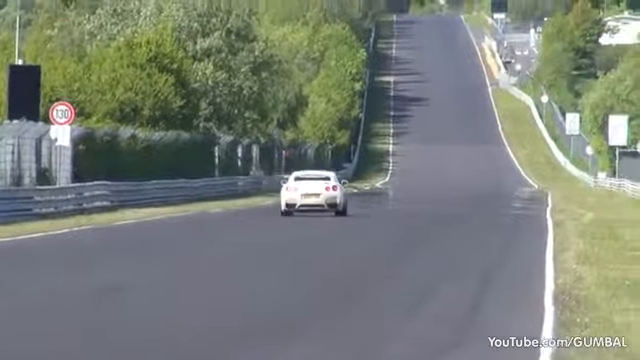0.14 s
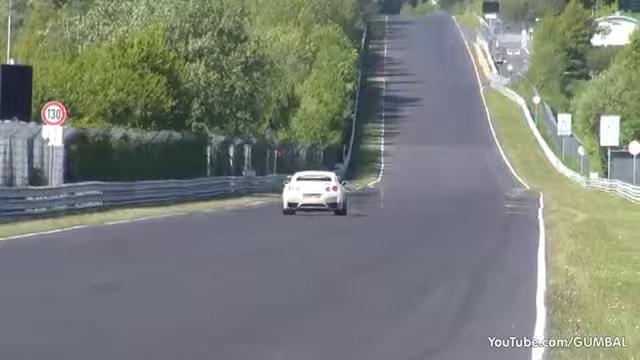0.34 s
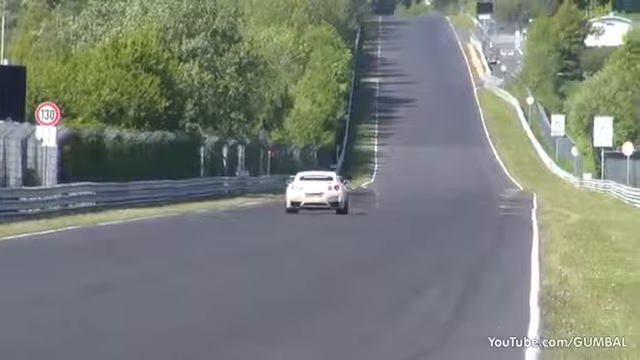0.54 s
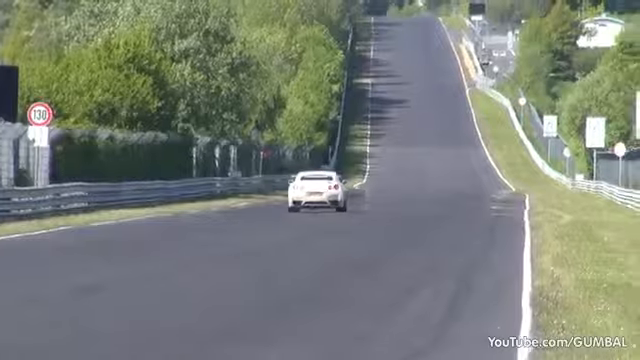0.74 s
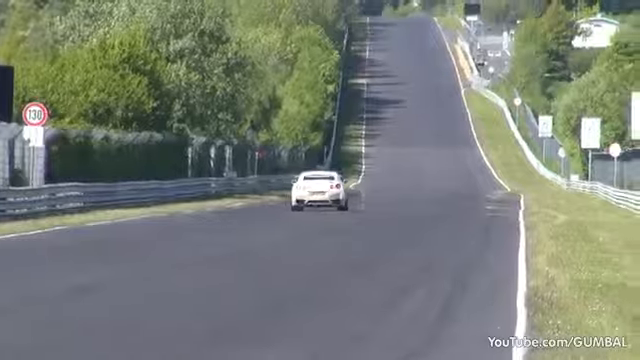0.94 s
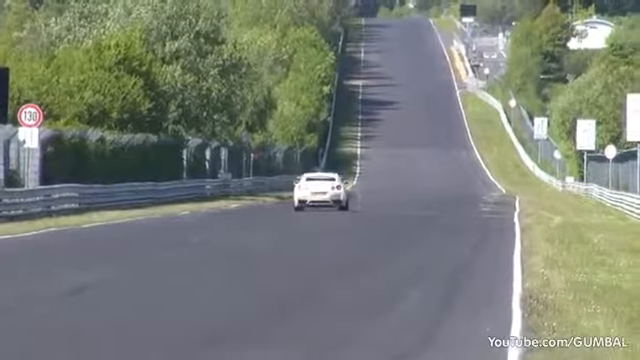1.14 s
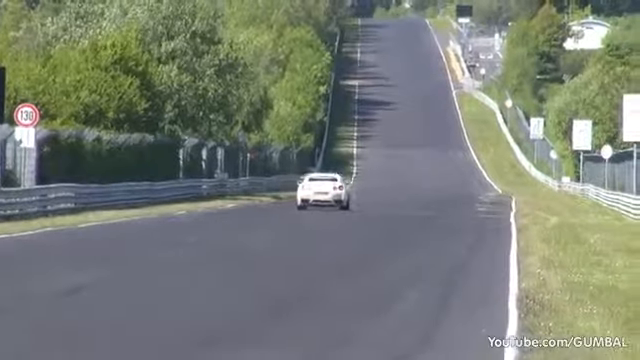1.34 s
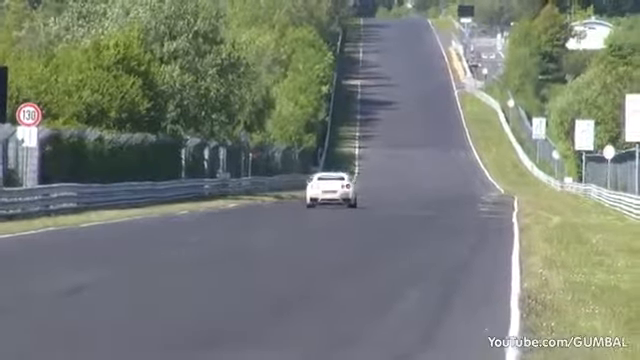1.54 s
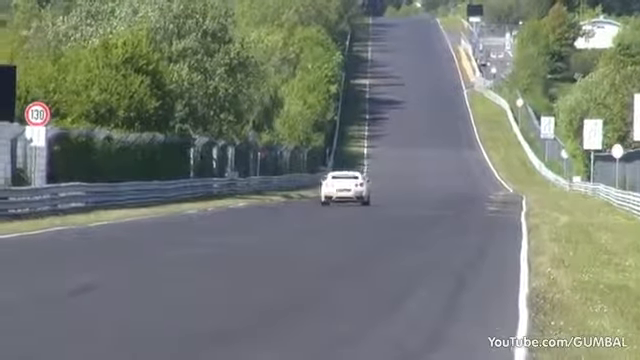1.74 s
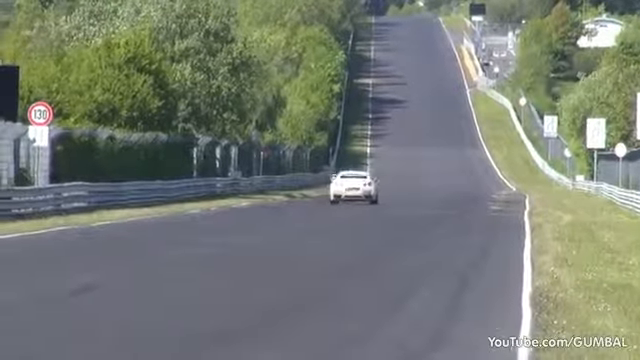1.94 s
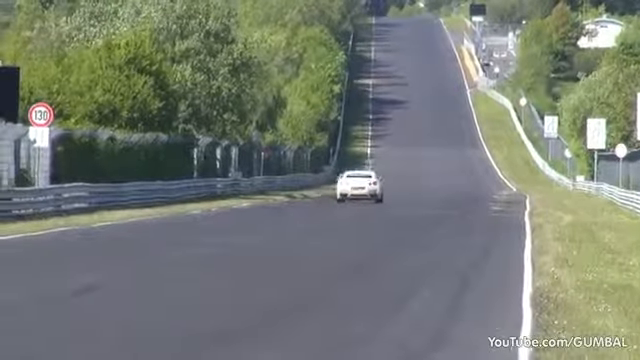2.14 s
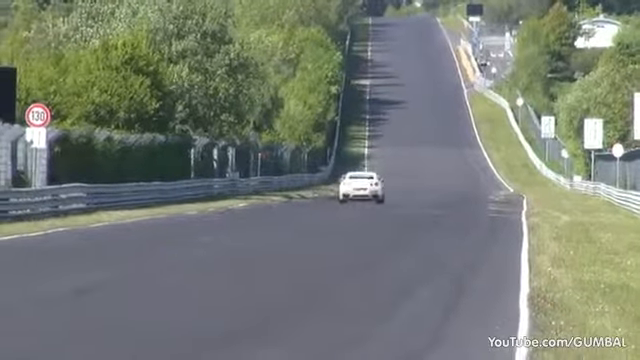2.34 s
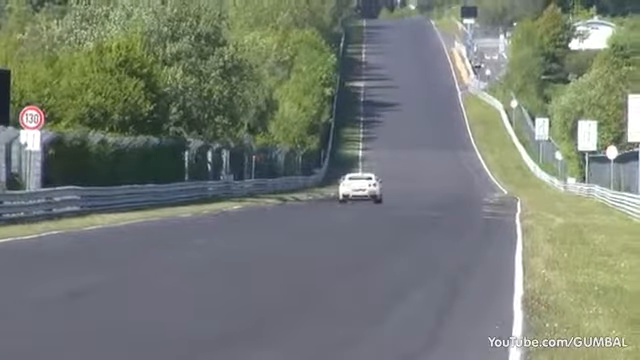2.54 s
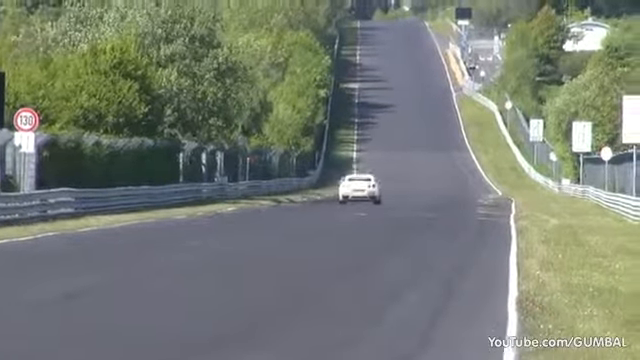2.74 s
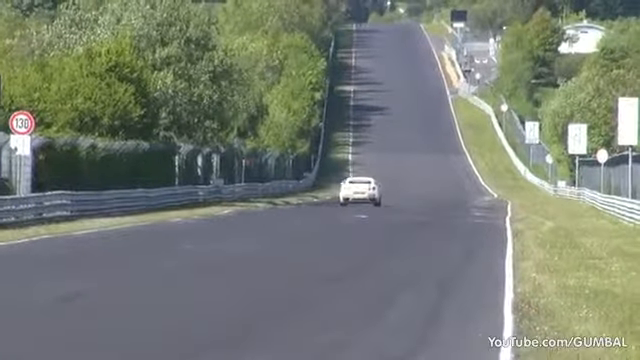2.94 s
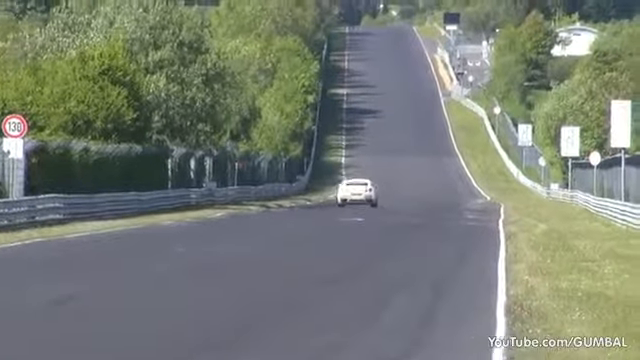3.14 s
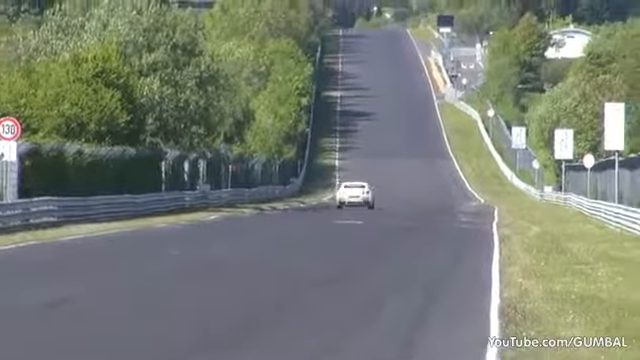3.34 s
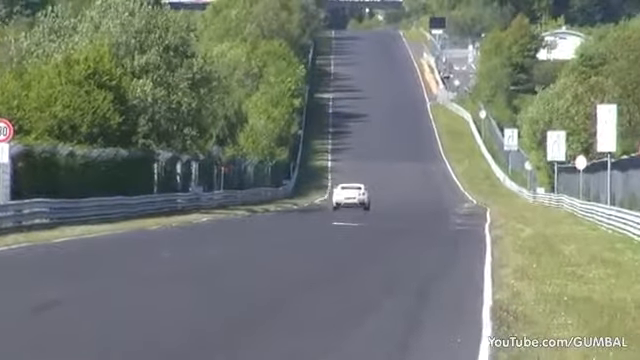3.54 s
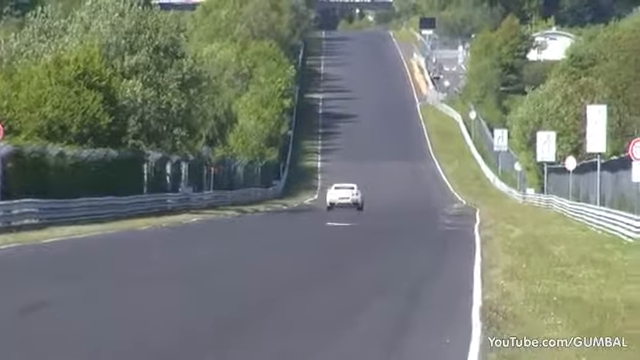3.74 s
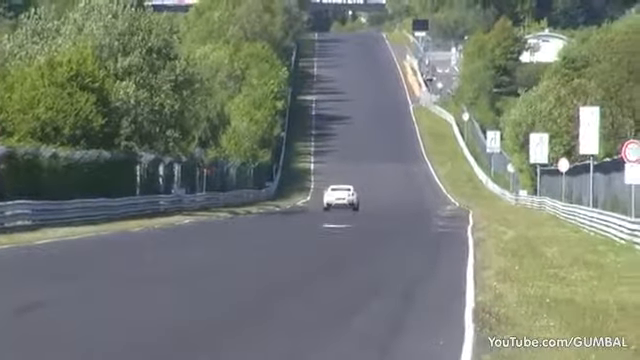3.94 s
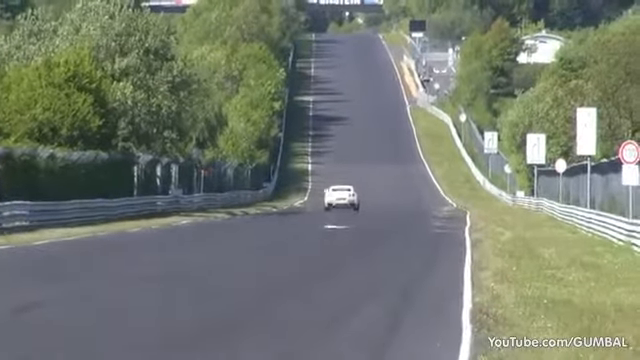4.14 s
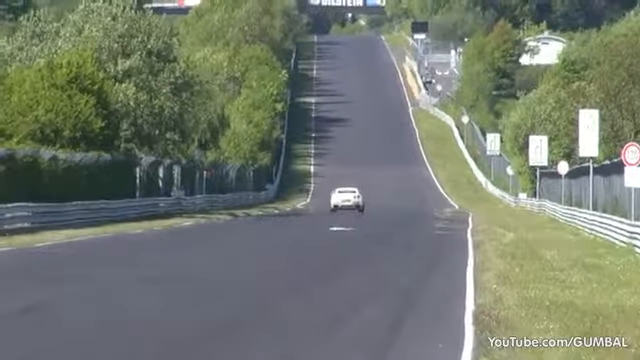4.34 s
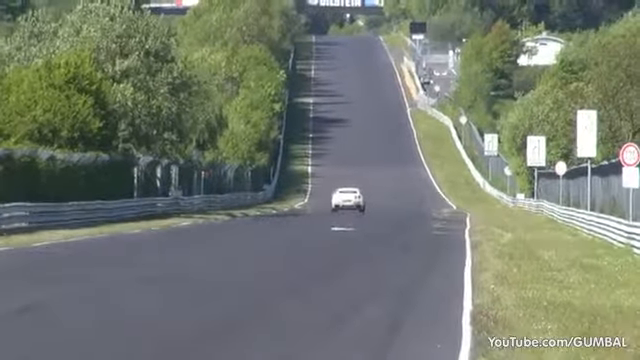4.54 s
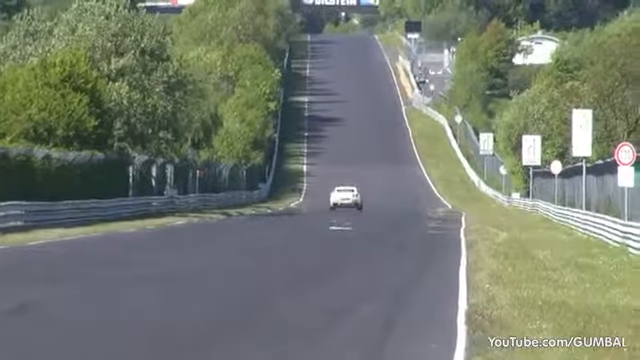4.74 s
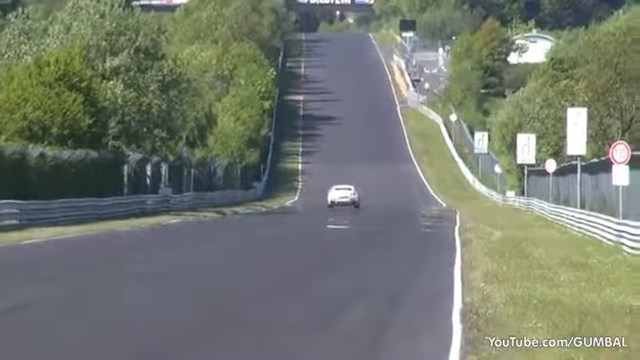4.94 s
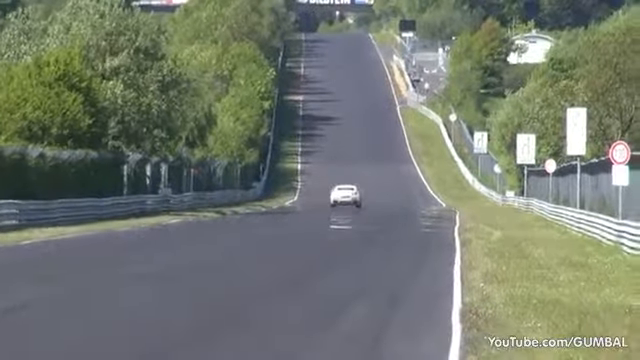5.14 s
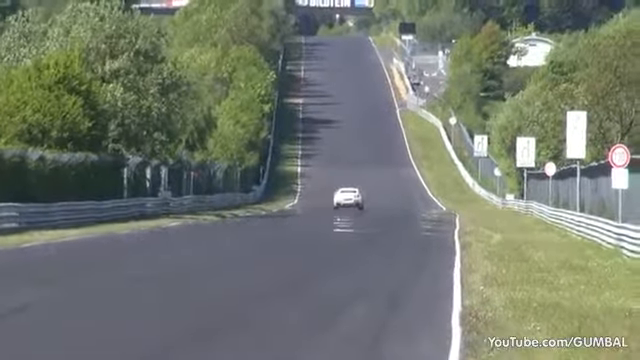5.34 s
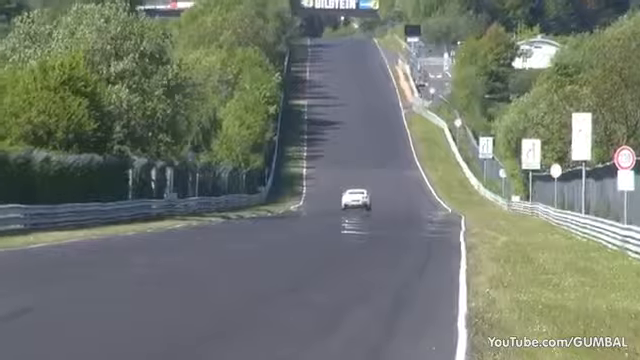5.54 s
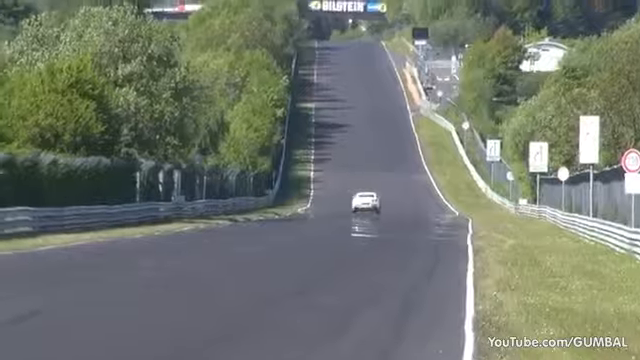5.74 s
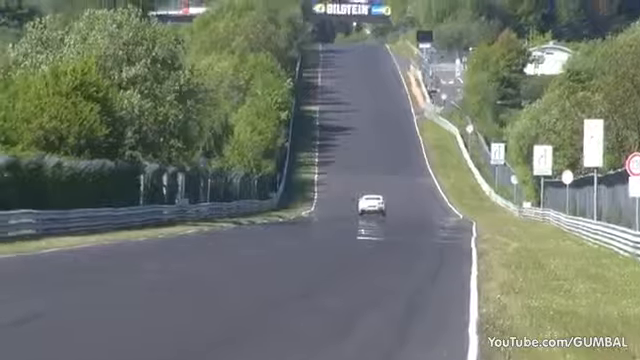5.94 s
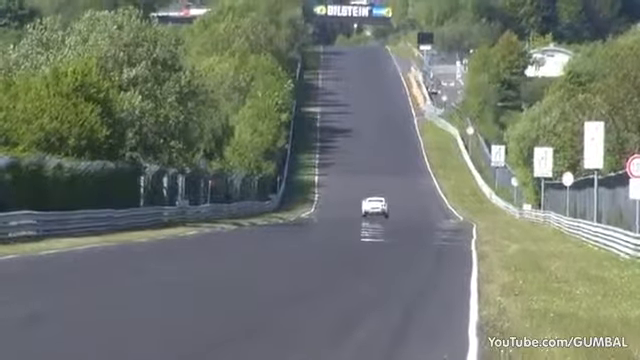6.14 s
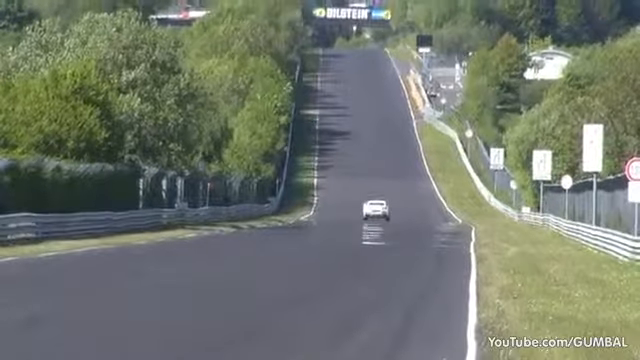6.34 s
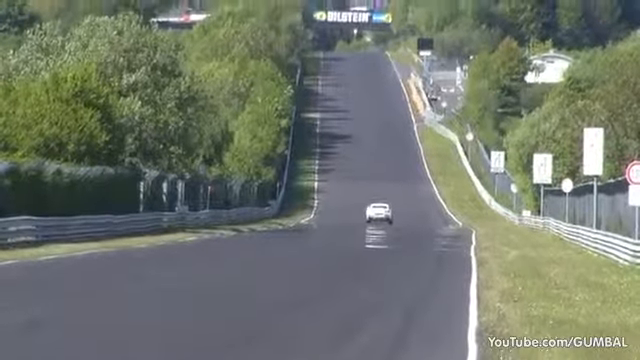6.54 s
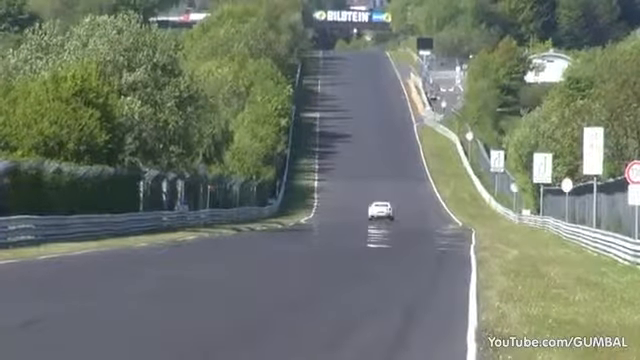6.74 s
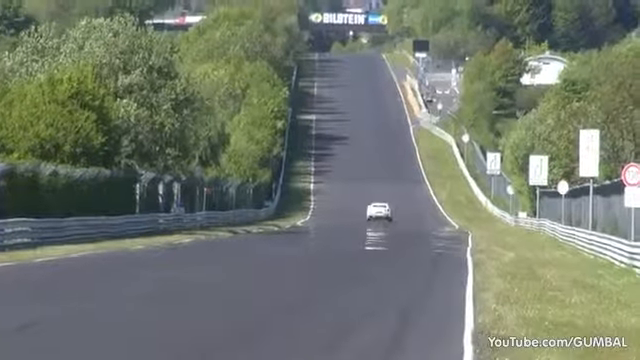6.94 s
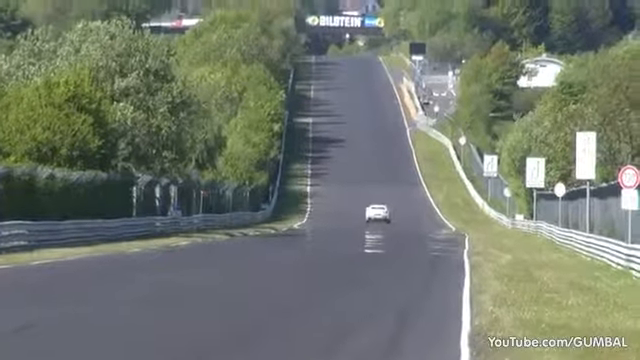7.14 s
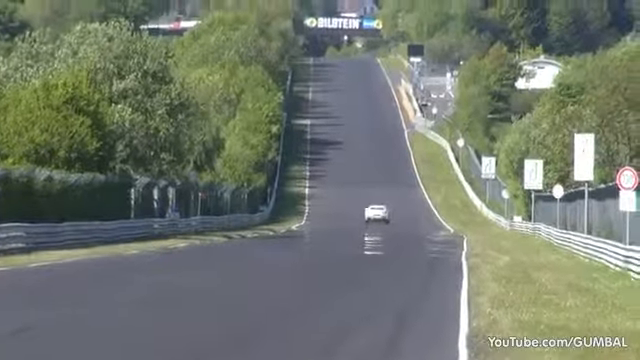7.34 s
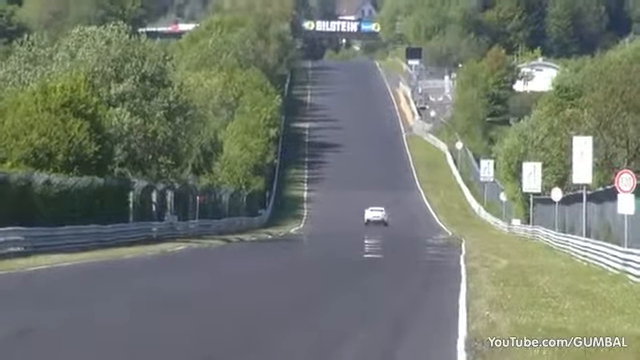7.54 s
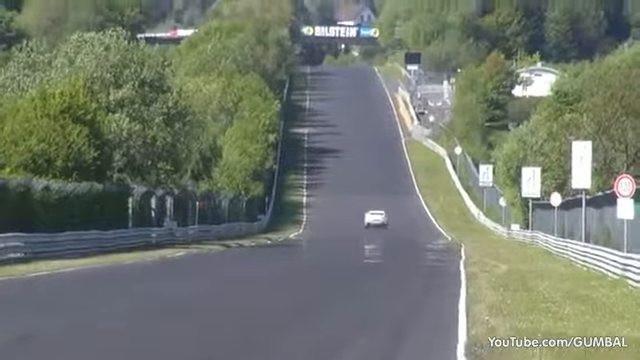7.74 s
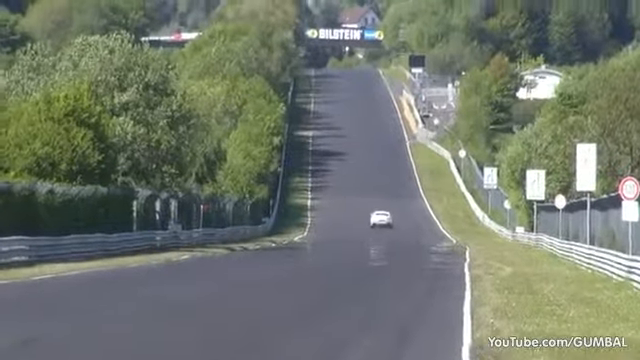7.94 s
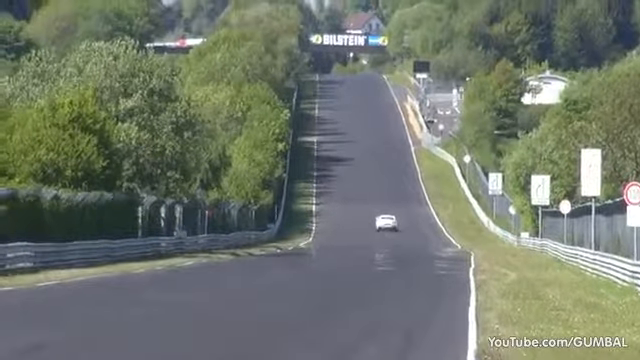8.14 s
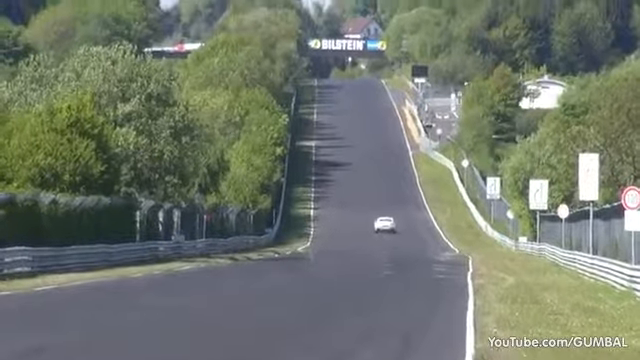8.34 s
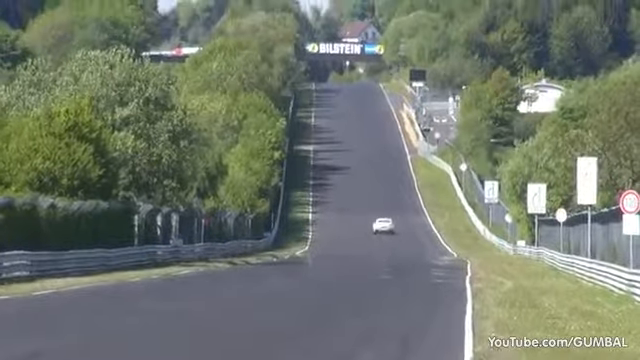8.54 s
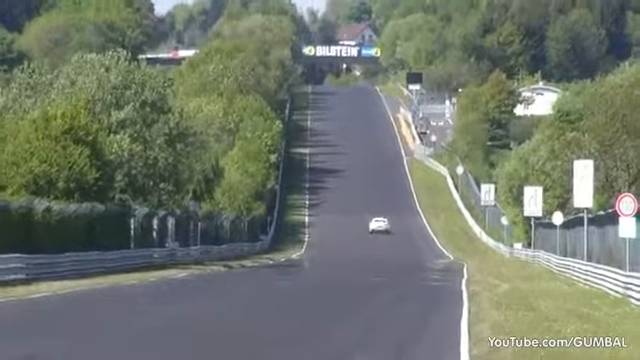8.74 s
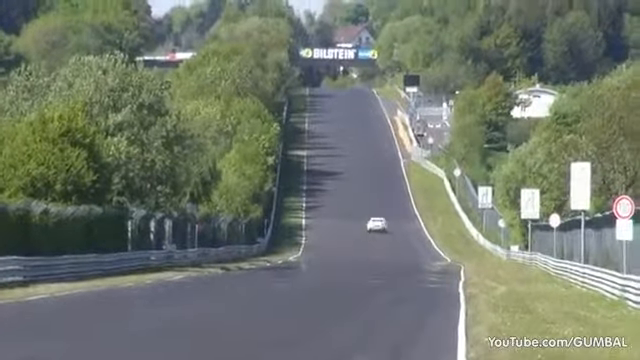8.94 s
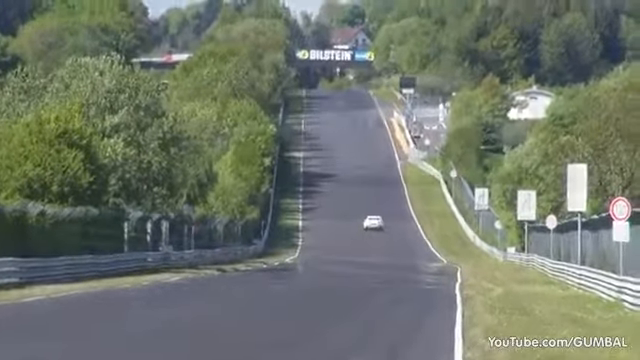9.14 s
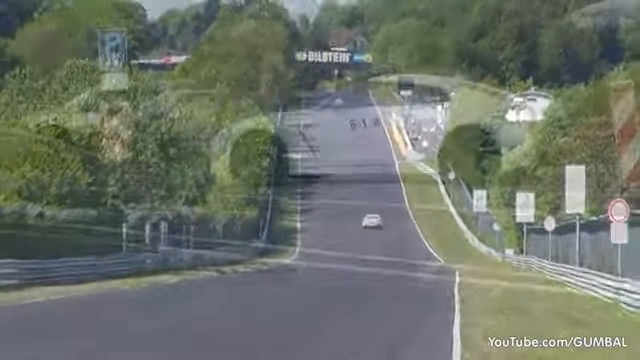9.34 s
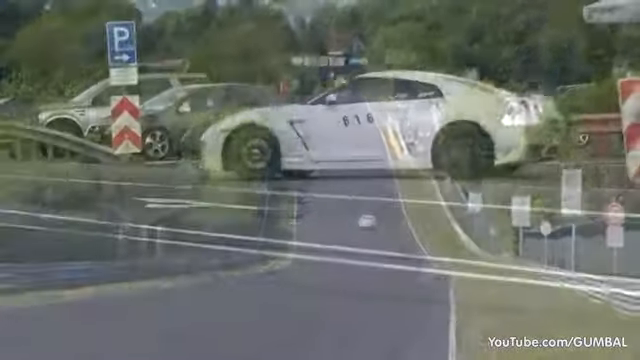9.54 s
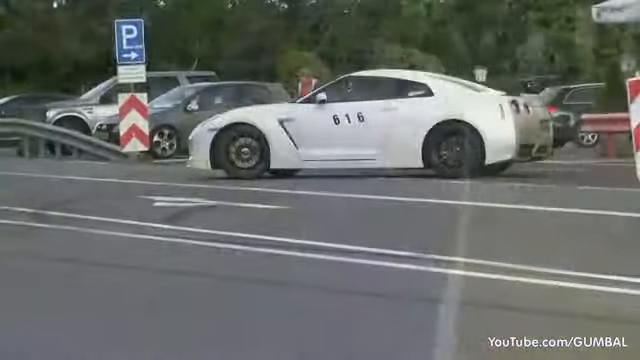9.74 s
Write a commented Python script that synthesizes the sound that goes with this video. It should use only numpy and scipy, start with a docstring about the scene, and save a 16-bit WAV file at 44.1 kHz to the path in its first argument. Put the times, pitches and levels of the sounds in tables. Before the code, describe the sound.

Outdoor trackside, stereo, with low wind and distant traffic rumble, faint steady generator hum and light hiss. From 0 s a six-cylinder car is already pulling away hard: a dense, buzzing exhaust howl with rough gas noise and rasp, its pitch rising steadily. At about 2.0 s it upshifts almost instantly, with a tiny flare, a short bark and a drop in pitch of nearly a quarter. It then climbs slowly again, losing rasp and becoming a smoother, weaker drone with distance. Tiny high bird peeps sound from 2.1 to 2.9 s. Dull, quickly damped metal knocks with bright rattle come close by at 7.1 s, then stronger at 8.0 s with smaller clatters until 8.3 s. From 8.4 s a second engine revs upward with a faint whine, peaking near 9.4 s. The first car fades after 9 s, as a low, uneven close engine burble and tyre noise swell to the end at 9.9 s.

```python
"""At a trackside, a six-cylinder car pulls away up a straight, shifts up once and recedes.
Its note is a sum of engine tones, and its gas noise comes in one puff per firing. A generator hums
on steady tones, and birds peep in short pure swells. Blows ring the tones of a metal plate nearby
in two bursts. A second car revs up, and at the end a third engine burbles close by in a few
wavering tones with tyre noise, while the first car fades out."""
import sys
import numpy as np
from scipy import signal
from scipy.fft import rfft, irfft, next_fast_len
from scipy.io import wavfile
from scipy.ndimage import uniform_filter1d

SR = 44100
rng = np.random.default_rng(int(sys.argv[2]) if len(sys.argv) > 2 else 0)


def digitize_waveform(pressure):
    """Quantize a signal to 16-bit integers and store it at the path in sys.argv[1].

    Rows of a 2-D input are taken as channels; values are limited to [-1, 1].
    """
    field = np.atleast_2d(pressure).T
    bounded = np.clip(field, -1, 1)
    quanta = np.round(bounded * 32767).astype(np.int16)
    wavfile.write(sys.argv[1], SR, quanta)


N = 436149   # length in samples
CUTOFF_HZ = 15800

# Generator tones. Each row: pitch in Hz, level in dB.
HUM_TONES = [(50.5, -45), (100.5, -53), (150, -57.5)]
# Wind and far traffic. Each row: frequency in Hz, strength in dB per Hz.
AIR_SPECTRUM = [(14, -28), (22, -6.5), (34, -4), (58, -3.5), (74, -19), (100, -6.5), (125, -14.5),
                (170, -16.5), (240, -12), (320, -43.5)]
# Microphone hiss. Each row: frequency in Hz, strength in dB per Hz.
HISS_SPECTRUM = [(1500, -1), (3000, -1.3), (6000, -1), (10000, -1.7), (15000, -1.5)]
AIR_DB, HISS_DB = -46, -59.5

# Receding car: distance in m at the start, speed in m/s.
START_M, RECEDES_M_PER_S = 100, 40
# Firings per second at the start of the low gear, and how many are gained per second.
LOW_GEAR_HZ, LOW_GEAR_CLIMB = 256.9, 10.7
# Firings per second in the high gear at the shift, gained per second, lost per second squared.
HIGH_GEAR_HZ, HIGH_GEAR_CLIMB, DRAG_SAG = 226.1, 7.24, .1786
# The revs flare (firings per second) as the clutch opens, then drop. Times in seconds.
SHIFT_S, SHIFT_DROP_S, FLARE_HZ, FLARE_S = 2.02, .058, 3, .03
# Exhaust tuning at the starting distance. Each row: firings per second, firing tone in dB,
# 2nd harmonic in dB, growl just below the 2nd harmonic in dB, 3rd harmonic in dB.
EXHAUST_TUNING = [(225, -15.5, -14.5, -23, -30), (236, -18, -12.5, -24, -24.5),
                  (243, -16.5, -13.5, -24.5, -25), (243.4, -18.5, -14, -24.5, -21),
                  (251.8, -16.5, -17, -25, -31), (258.3, -14.5, -18.5, -21.5, -30.5),
                  (262.7, -14.5, -19.5, -20.5, -32.5), (274, -14, -18, -17.5, -28.5),
                  (278.5, -15, -16.5, -16.5, -28.5)]
# Extra loss over the ground for the same four tones, in dB per 100 m.
GROUND_LOSS_DB = [1.38, .6, 0.15, 1.0]
# Tones from uneven cylinders. Each row: multiple of the engine cycle, dB above the growl.
UNEVEN_TONES = [(5, -19), (7, -19), (8, -21), (9, -12), (10, -12), (13, -12), (14, -20)]
# Highest tones. Each row: multiple of the engine cycle, dB above the 3rd harmonic.
UPPER_TONES = [(16, -10), (19, -9), (24, -15)]
UPPER_GROWL_DB = -4.5   # multiple 17, above the mean of growl and 3rd harmonic
# Strength of each exhaust puff in dB, before smearing; one bank of cylinders is louder.
CYLINDER_DB = [3.5, 2.5, -2.5, -4.0, -2.5, 2.5]
# The pulse smears with distance. Each row: time in seconds, phase shift in radians.
PULSE_SKEW = [(0, -0.5), (4.2, -0.5), (6.3, 1.5), (9.89, 4)]
# Side the car is heard on. Each row: time in seconds, left minus right in dB.
CAR_PAN = [(0, 1), (1.7, 1.5), (3.6, 0.43), (6.6, 1.15), (7.6, 0.8), (9.89, 2.3)]
# Low, middle and high exhaust noise. Each row: frequency in Hz, strength in dB per Hz.
BODY_SPECTRUM = [(170, -15), (270, -7), (400, -3), (600, -4), (850, -3), (1050, -15), (1300, -25.5)]
ROAR_SPECTRUM = [(700, -21.5), (950, 0.5), (1400, -0.5), (1650, -6), (1900, -16.5), (2400, -25.5)]
RASP_SPECTRUM = [(1500, -13), (2000, 1.5), (2500, -1), (3500, -10), (4200, -19.5), (5500, -27.5),
                 (7000, -45)]
# Exhaust noise before bark and fade. Each row: time in seconds, roar in dB, rasp in dB.
GAS_LEVELS = [(0, -34.5, -39), (0.35, -34.5, -37), (0.7, -35, -43.5), (1.9, -36.5, -45.5),
              (2.5, -38, -42.5), (3.4, -39.5, -53), (4.1, -36, -53.5), (4.6, -38.5, -55), (5, -37, -60.5),
              (5.4, -44, -64), (6.2, -46, -68), (7, -47, -65.5), (8.3, -47, -53.5), (9.89, -47, -79)]
# Bark of the upshift, a row for each of the four tones, the roar and the rasp.
# Each row: seconds after the shift, greatest change in dB.
SHIFT_BARK = [(.025, 4), (.04, 9), (.055, -8), (.045, 8), (.027, 4), (.035, 2)]
BARK_S = .025   # width of the bark
FADE_S, FADE_DB_PER_S = 9.03, 16   # when the car starts to fade, and how fast

# Bird peeps, one kind far higher and fainter. Each row: start in seconds,
# peak in dB before a slight waver, pitch in Hz, length in seconds.
BIRD_PEEPS = [(2.269, -51.5, 7170, .055), (2.325, -61, 7180, 0.046), (2.382, -57, 7190, .035),
              (2.43, -66.5, 7180, .03), (2.52, -62, 7200, 0.018), (2.545, -62, 7180, .04),
              (2.59, -62, 7180, .04), (2.75, -53, 7130, .075), (2.832, -63, 7140, .05),
              (2.887, -69, 7120, .05), (2.125, -67.5, 11200, .07), (2.45, -67, 11220, .085),
              (2.545, -69, 11310, .1), (2.66, -70, 11090, .12)]

# Blows on the plate. Each row: time in seconds, strength in dB, left minus right in dB,
# rattle in dB before its own swell and fade.
PLATE_BLOWS = [(7.1163, -13.5, -7, -37.5), (7.1916, -24.5, 0, -67), (7.9645, -9, -4.5, -29.5),
               (8.0422, -21.5, -4, -58), (8.096, -34, 5, -64), (8.1665, -30, -6, -53),
               (8.2044, -28, -4, -41), (8.2518, -23.5, -9, -37)]
# Ringing tones of the plate. Each row: pitch in Hz, level in dB, seconds to fall by 60 dB.
PLATE_MODES = [(520, -6, .03), (850, -9, .04), (1314, -3, .03), (1421, 0, .045), (1600, -3, .025),
               (1780, -3, .025), (1943, -4, .035), (2121, -5, .05), (2350, -11, .025), (2800, -16, .03)]
# Parts of one soft blow. Each row: seconds early, level in dB.
BLOW_TOUCHES = [(.004, -13), (0, -7), (-.012, -17)]
# Bright rattle. Each row: frequency in Hz, strength in dB per Hz.
RATTLE_SPECTRUM = [(2400, 8.5), (3400, 4.5), (5000, -2.5), (8000, -16), (14000, -26)]

# Second car's note. Each row: time in seconds, level in dB.
REVVING_LEVEL = [(7.3, -58), (8.0, -50), (8.42, -48), (8.6, -41), (9.0, -43), (9.25, -39), (9.36, -33),
                 (9.5, -37), (9.7, -56)]
# Its tones. Each row: multiple of the firing rate, level in dB against the note.
REVVING_ORDERS = [(1.0, 0), (1.5, -7), (2.0, -2), (3.0, -3)]
# Its faint whine. Each row: frequency in Hz, strength in dB per Hz.
WHINE_SPECTRUM = [(3200, -22), (3450, -7), (3570, -4.5), (3700, -7.5), (3950, -32)]
# Each row: time in seconds, whine level in dB before a slight waver.
WHINE_LEVEL = [(8.2, -75), (8.6, -68), (9.1, -55), (9.4, -57), (9.7, -93)]
# Firings per second at first; when the throttle opens, in seconds.
REV_IDLE_HZ, REV_BITE_S = 81, 8.42
# The revs then jump (firings per second, over seconds) and climb (firings per second, each second).
REV_JUMP_HZ, REV_JUMP_S, REV_CLIMB = 9, .18, 58

# Close engine. Each row: time in seconds, tone in dB, tyre and flow noise in dB before a waver.
CLOSE_LEVELS = [(8.0, -70, -54), (8.6, -62, -44), (9.1, -55, -37), (9.5, -45, -35), (9.61, -32, -34),
                (9.89, -29.5, -33)]
# Its tones. Each row: multiple of the firing rate, level in dB against the tone level.
CLOSE_ORDERS = [(1.0, 0), (1.5, -11), (2.0, -6), (3.0, -11), (4.0, -5), (5.0, -11)]
# Tyre and flow noise. Each row: frequency in Hz, strength in dB per Hz.
FLOW_SPECTRUM = [(40, -15.5), (100, -1), (300, -3.5), (700, -6), (1500, -12), (3000, -21.5), (6000, -34.5),
                 (14000, -51.5)]
# Firings per second at first; when it starts to pull, in seconds; gained per second.
CLOSE_HZ, CLOSE_PULL_S, CLOSE_CLIMB = 55, 9.58, 17


def from_db(db):
    """Turn decibels into a gain."""
    return np.exp(np.asarray(db) * (np.log(10) / 20))


def rms_one(x):
    """Scale a sound to an average (rms) strength of 1."""
    return x / np.sqrt(np.mean(x ** 2) + 1e-20)


def clock():
    """Give the time in seconds at every sample."""
    return np.arange(N) / SR


def in_time(rows):
    """Draw each column of a timed table as a curve with a value at every sample."""
    s, *columns = np.transpose(rows)
    return [np.interp(clock(), s, column) for column in columns]


def drift(rate):
    """Wander slowly by chance, with spread 1 and mostly below the rate in Hz."""
    step = 40   # samples between the drawn points
    r = np.exp(-2 * np.pi * rate * step / SR)
    noise = rng.standard_normal(N // step + 2002)
    slow = signal.lfilter([1], [1, -2 * r, r * r], noise)[2000:]
    return np.interp(np.arange(N) / step, np.arange(len(slow)), rms_one(slow))


def coloured(x, spectrum):
    """Give white noise a spectrum that falls away steeply beyond the table, at rms 1."""
    hz, db = np.transpose(spectrum)
    size = next_fast_len(N, True)
    log_hz = np.log(np.maximum(np.fft.rfftfreq(size, 1 / SR), 1))
    gain = from_db(np.interp(log_hz, np.log(hz), db, left=-70, right=-70))
    return rms_one(irfft(rfft(x, size) * gain, size)[:, :N])


def wide_noise(alike):
    """Make stereo white noise; alike is 0 for unrelated sides, 1 for equal ones."""
    mid, side = rng.standard_normal((2, N))
    return np.sqrt(1 + alike) * mid + np.sqrt(1 - alike) * side * [[1], [-1]]


def place(x, pan_db, lag):
    """Make the left side louder by pan_db and late by lag samples."""
    left, right = x * np.ones((2, 1))
    left = np.interp(np.arange(N) - lag, np.arange(N), left)
    return np.array([left * from_db(pan_db / 2), right * from_db(-pan_db / 2)])


def tones(hz, orders, waver_db, rate):
    """Sum multiples of a running pitch, each of rms 1 at 0 dB and wavering on its own."""
    turn = 2 * np.pi * np.cumsum(hz) / SR
    total = 0
    for k, db in orders:
        gain = np.sqrt(2) * from_db(db + waver_db * drift(rate))
        total = total + gain * np.cos(k * turn + k * k)
    return total


def background():
    """Sum steady generator tones, low air noise that swells and sinks, and even hiss."""
    hum = tones(1 + 0.013 * drift(7.5), HUM_TONES, waver_db=0.5, rate=3.3)
    air = from_db(AIR_DB + 2.0 * drift(5.2)) * coloured(wide_noise(0.32), AIR_SPECTRUM)
    hiss = from_db(HISS_DB) * coloured(wide_noise(0), HISS_SPECTRUM)
    return place(hum, 2.0, 0.0) + air + hiss


def firing_rate():
    """Let the revs climb in one gear, flare, drop to the next and climb ever more slowly."""
    t = clock()
    since = np.maximum(t - SHIFT_S, 0)
    before = t - since   # stands still after the shift
    low = LOW_GEAR_HZ + LOW_GEAR_CLIMB * before + FLARE_HZ * np.exp((before - SHIFT_S) / FLARE_S)
    high = HIGH_GEAR_HZ + HIGH_GEAR_CLIMB * since - DRAG_SAG * since ** 2
    return high + (low - high) * np.exp(-(since / SHIFT_DROP_S) ** 1.5)


def car_levels(hz):
    """Set four tones by revs and distance, roar and rasp by time; all bark at the shift and fade."""
    t = clock()
    metres = START_M + RECEDES_M_PER_S * t
    spreading_db = 20 * np.log10(metres / START_M)
    revs, *tuned = np.transpose(EXHAUST_TUNING)
    levels = []
    for db, loss_db in zip(tuned, GROUND_LOSS_DB):
        ground_db = loss_db * (metres - START_M) / 100
        levels.append(np.interp(hz, revs, db) - spreading_db - ground_db)
    levels += in_time(GAS_LEVELS)
    fade_db = FADE_DB_PER_S * np.maximum(t - FADE_S, 0)
    barking = []
    for db, (late_s, bark_db) in zip(levels, SHIFT_BARK):
        bump = np.exp(-((t - SHIFT_S - late_s) / BARK_S) ** 2)
        barking.append(db + bark_db * bump - fade_db)
    return barking


def swirling(x, patchy_db):
    """Swell and sink the lower and upper parts of a noise each on its own, as eddies pass."""
    low = uniform_filter1d(x, 12, axis=1)   # a 12-sample average keeps the lower part
    return from_db(patchy_db * drift(9)) * low + from_db(patchy_db * drift(5)) * (x - low)


def receding_car():
    """Add clean exhaust tones to gas noise puffed out once per firing."""
    hz = firing_rate()
    (skew,), (pan_db,) = in_time(PULSE_SKEW), in_time(CAR_PAN)
    first_db, second_db, growl_db, third_db, roar_db, rasp_db = car_levels(hz)
    firings = np.cumsum(hz * (1 + .0012 * drift(15))) / SR   # running count
    cycle = 2 * np.pi * firings / 6   # six firings a cycle

    orders = [(6, first_db), (12, second_db), (11, growl_db), (18, third_db)]
    orders += [(k, growl_db + db) for k, db in UNEVEN_TONES]
    orders += [(k, third_db + db) for k, db in UPPER_TONES]
    orders += [(17, (growl_db + third_db) / 2 + UPPER_GROWL_DB)]
    note = 0
    for k, db in orders:
        off = (k + 3) % 6 - 3   # steps from the nearest firing harmonic
        # unequal pipes spread the strong puffs over half a cycle
        spread = 1.2 * max(off, 0) + 2 * min(off + 1, 0)
        flutter_db = .075 * k * drift(12)   # air turbulence shakes the higher orders more
        note = note + np.sqrt(2) * from_db(db + flutter_db) * np.cos(k * cycle + skew + spread)
    note = note * np.minimum(firings / 3, 1)   # eases in over three firings

    count = firings.astype(int)
    chance_db = 0.8 * rng.standard_normal(count[-1] + 1)[count]
    strength_db = np.array(CYLINDER_DB)[count % 6] + chance_db
    puffs = from_db(strength_db) * (1 + np.exp(-2.5 * (firings - count)))

    gust = drift(4.4)
    body_db = (second_db + growl_db) / 2 - 2.5
    # the roadside smears the puffs, most in the treble, so their depth shrinks
    # each row: spectrum, level in dB, patchiness in dB, puff depth (a power), left-right likeness
    zones = [(BODY_SPECTRUM, body_db, 1.2, .8, .97),
             (ROAR_SPECTRUM, roar_db, 1.5, .5, .85),
             (RASP_SPECTRUM, rasp_db, 1.5, .4, .7)]
    noise = 0
    for spectrum, level_db, patchy_db, depth, alike in zones:
        gas = coloured(wide_noise(alike) * puffs ** depth, spectrum)
        noise = noise + from_db(level_db + .8 * gust) * swirling(gas, patchy_db)
    return place(note + noise, pan_db, np.linspace(-2.2, 1.5, N))


def bird():
    """Make thin high peeps, each a rounded swell of one pitch."""
    out = np.zeros(N)
    for s, peak_db, hz, length_s in BIRD_PEEPS:
        t = np.arange(int(length_s * SR)) / SR
        swell = np.sin(np.pi * t / length_s) ** .7
        out[int(s * SR):][:len(t)] += from_db(peak_db) * swell * np.sin(2 * np.pi * hz * t)
    return place(out * from_db(1.5 * drift(40)), 0.0, 0.64)


def plate():
    """Ring the plate's tones with soft blows of several touches; a bright rattle follows and dies."""
    s, blow_db, pan_db, rattle_db = np.transpose(PLATE_BLOWS)
    at = (s * SR).astype(int)
    sides = from_db(np.array([pan_db, -pan_db]) / 2)
    ring = np.zeros((2, N))
    for hz, level_db, t60 in PLATE_MODES:
        clicks = np.full((2, N), 1e-18)   # never quite zero, which keeps the filter fast
        sign = (-1) ** int(hz)   # some tones start upwards, some downwards
        for early_s, touch_db in BLOW_TOUCHES:
            chance_db = rng.normal(0, 2.0, len(at))
            gain = from_db(blow_db + level_db + touch_db + chance_db)
            clicks[:, at - int(early_s * SR)] = sides * gain * sign
        r, w = from_db(-60 / (t60 * SR)), 2 * np.pi * hz / SR
        ring += signal.lfilter([0, np.sin(w)], [1, -2 * r * np.cos(w), r * r], clicks)
    ring = signal.sosfilt(signal.butter(4, 2300, fs=SR, output="sos"), ring)   # dull the top

    t = np.arange(SR // 4) / SR
    tail = wide_noise(0)[:, :len(t)] * from_db(-41 - 60 * t / 0.37)
    echo = signal.fftconvolve(ring, tail, axes=1)[:, :N]

    blows = np.zeros(N)
    blows[at - int(.003 * SR)] = from_db(rattle_db)
    rise = np.clip(t / 0.013, .4, 1) ** 2
    fall = from_db(-60 * t / 0.096) + 0.18 * from_db(-60 * t / .5)   # fast, then a slow rest
    rattle = signal.fftconvolve(blows, rise * fall)[:N] * coloured(wide_noise(0.16), RATTLE_SPECTRUM)
    return ring + echo + rattle


def revving_car():
    """Let a second engine's firing tones jump and climb, with a narrow band of noise as its whine."""
    (level_db,), (whine_db,) = in_time(REVVING_LEVEL), in_time(WHINE_LEVEL)
    since = np.maximum(clock() - REV_BITE_S, 0)
    hz = REV_IDLE_HZ + REV_JUMP_HZ * np.minimum(since / REV_JUMP_S, 1) + REV_CLIMB * since
    hz = hz * (1 + .006 * drift(10))
    note = from_db(level_db) * tones(hz, REVVING_ORDERS, waver_db=1.6, rate=8)
    whine = from_db(whine_db + 1.2 * drift(12)) * coloured(wide_noise(0.34), WHINE_SPECTRUM)
    return place(note, 1.2, 8.8) + whine


def close_engine():
    """Burble low and unevenly on wavering firing tones, with tyre and flow noise swelling around."""
    tone_db, flow_db = in_time(CLOSE_LEVELS)
    hz = CLOSE_HZ + CLOSE_CLIMB * np.maximum(clock() - CLOSE_PULL_S, 0)
    burble = from_db(tone_db) * tones(hz, CLOSE_ORDERS, waver_db=2.8, rate=12)
    flow = from_db(flow_db + 0.97 * drift(8)) * coloured(wide_noise(0.41), FLOW_SPECTRUM)
    return place(burble, 3.2, 6.0) + flow


def scene():
    """Add up everything heard at the trackside."""
    return background() + receding_car() + bird() + plate() + revving_car() + close_engine()


def record(dry):
    """Cut off the treble with a steep low-pass filter."""
    return signal.sosfilt(signal.cheby2(16, 80, CUTOFF_HZ, fs=SR, output="sos"), dry)


dry = scene()
out = record(dry)
digitize_waveform(out)
```